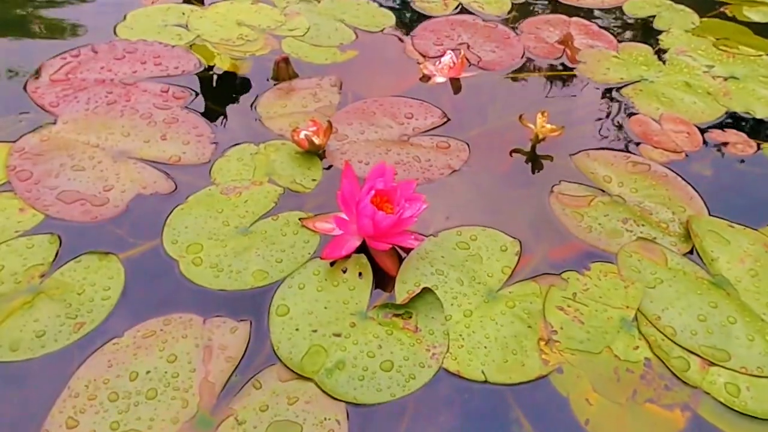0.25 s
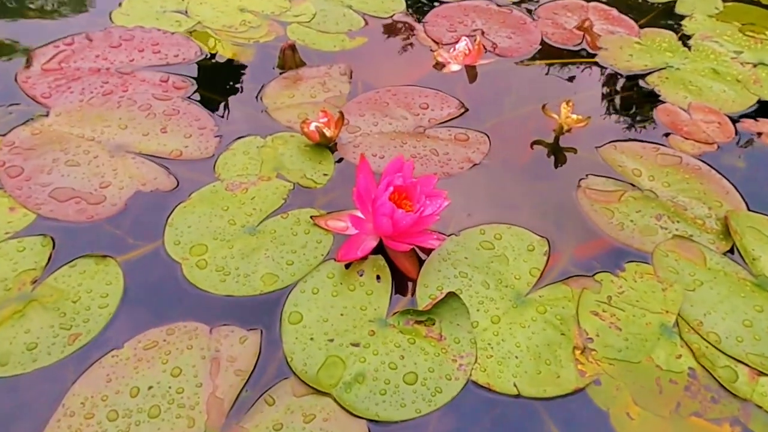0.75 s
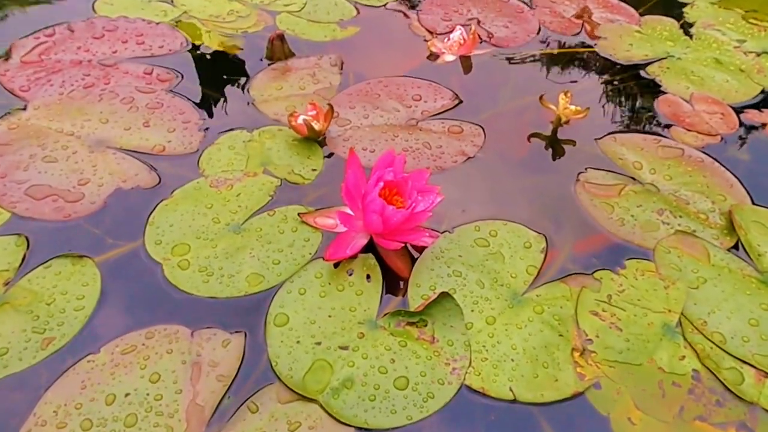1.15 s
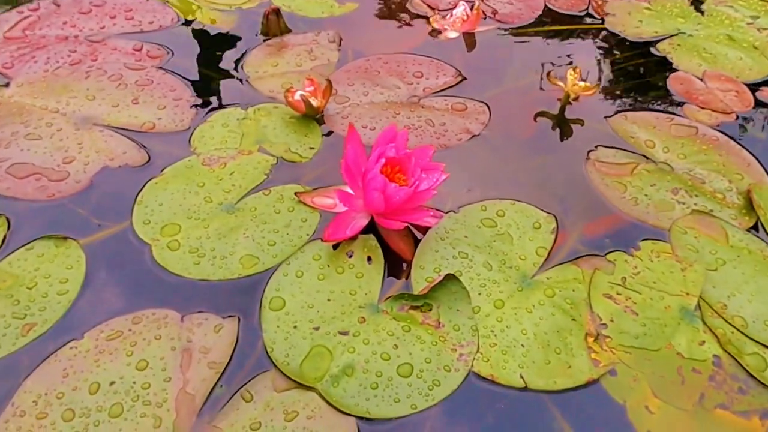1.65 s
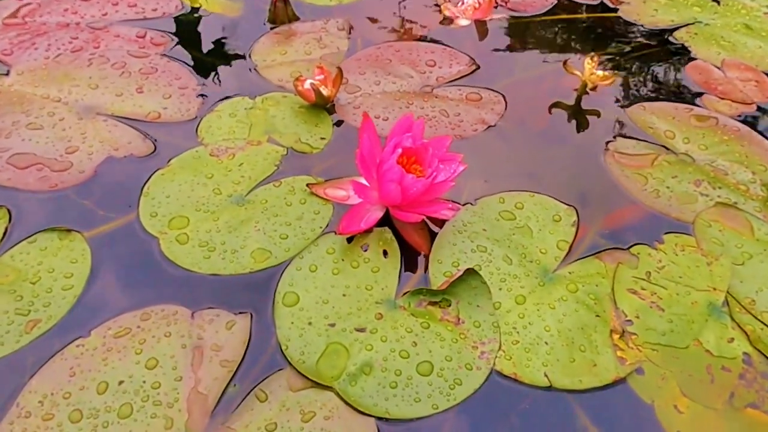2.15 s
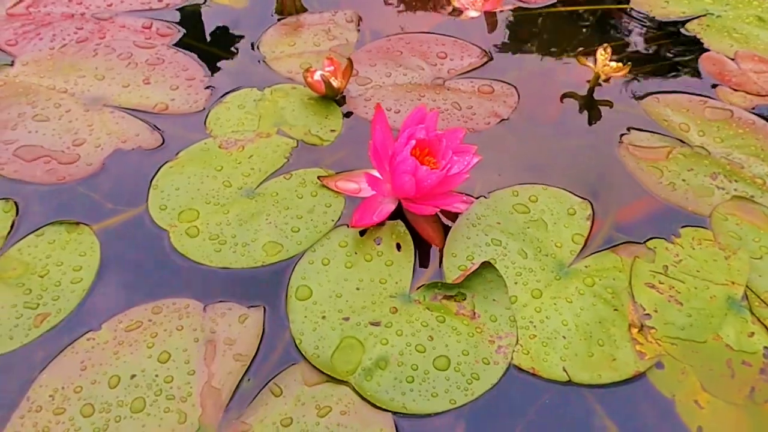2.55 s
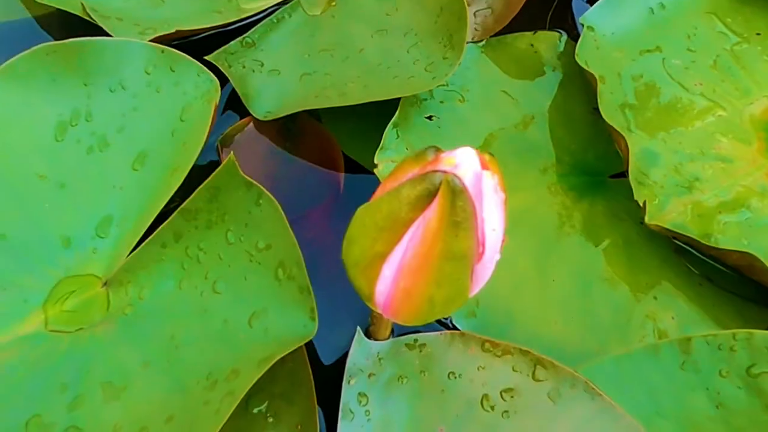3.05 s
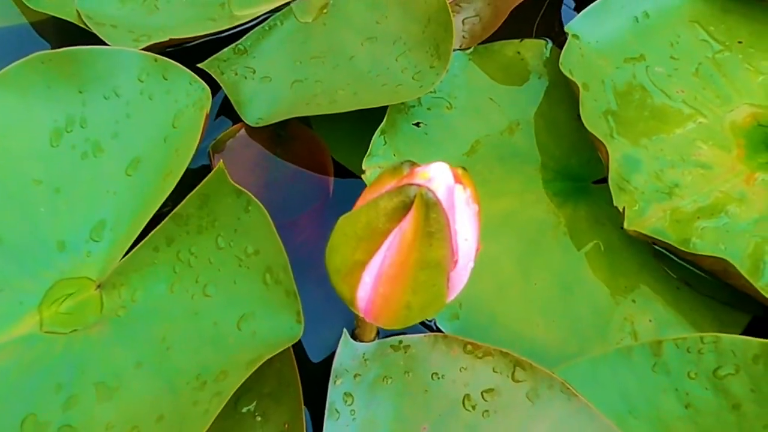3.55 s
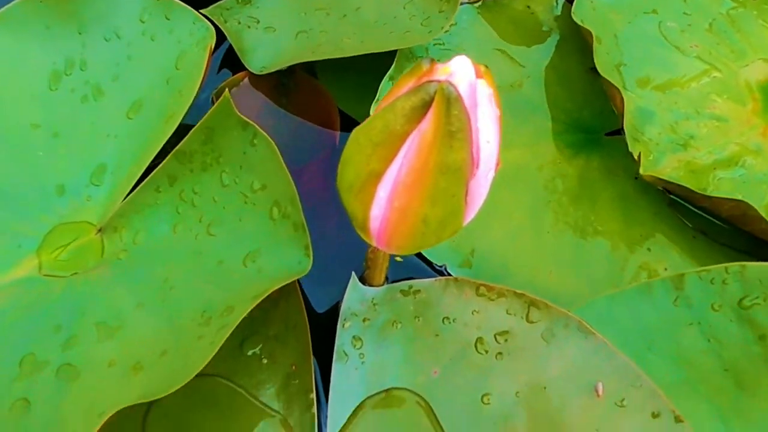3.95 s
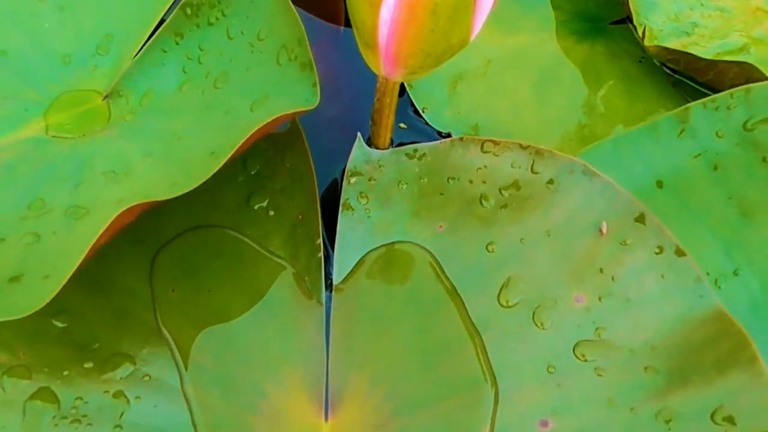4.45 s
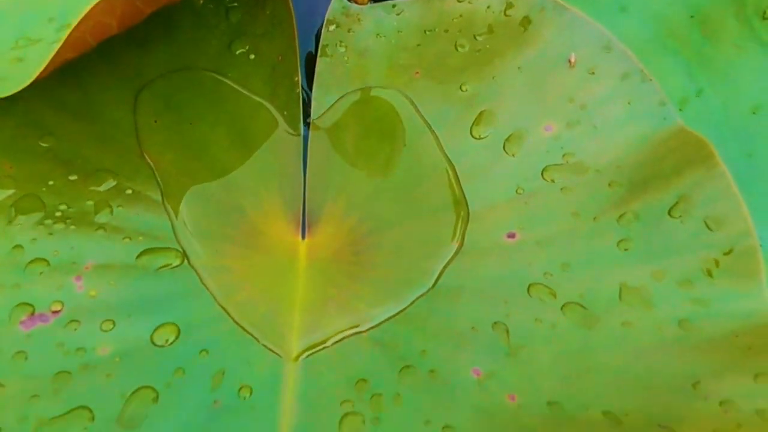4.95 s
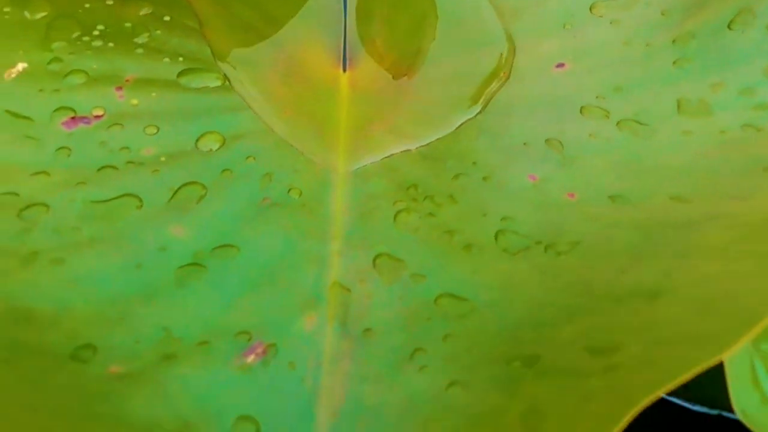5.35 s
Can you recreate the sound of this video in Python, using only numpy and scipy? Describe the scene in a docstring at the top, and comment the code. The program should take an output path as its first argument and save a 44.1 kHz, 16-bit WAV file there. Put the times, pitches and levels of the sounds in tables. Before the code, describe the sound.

Outdoors by a pond, rain falls steadily with a thick hiss of countless small drops, crisp irregular slaps on nearby leaves and little rising bubble ticks. Soft hollow watery tones slide beneath during the first part. The level stays nearly constant for three seconds, then collapses fast. The rest is almost silent: low garden murmur, faint whistly hiss and a far-off steady hum. Close, dry, narrow stereo pickup.

```python
"""A rain shower on a lily pond, full and rather dull, over a low rumble of air; a short bright patter leads in.
Near drops slap the floating leaves as brief pulses, and tiny bubbles in the water ring with rising pitch.
Crowds of small rings and shaped noise make the farther rain; soft hollow tones slide through it.
After three seconds the shower fades out quickly, leaving a faint outdoor murmur, a whistly hiss
and a far-off hum of two sines, perhaps a pump."""
import sys
import numpy as np
from scipy import signal
from scipy.fft import rfft, irfft, next_fast_len
from scipy.io import wavfile
from scipy.ndimage import uniform_filter1d, map_coordinates

SR = 44100
rng = np.random.default_rng(int(sys.argv[2]) if len(sys.argv) > 2 else 0)


def to_wav(sig):
    """Store sig (one row per channel, or 1-D mono) as 16-bit WAV at the path in sys.argv[1].

    Samples outside -1..1 are clipped; the rate is SR.
    """
    pcm = np.clip(np.atleast_2d(sig), -1, 1) * 32767
    pcm = np.round(pcm).astype(np.int16)
    wavfile.write(sys.argv[1], SR, pcm.T)  # frames by channels


N = 246959  # length [samples]

# the shower comes in, holds, then drops and low sounds fade together
SHOWER_FROM_S, SHOWER_RISE_S, SHOWER_UNTIL_S, LOW_UNTIL_S = 0.12, 0.031, 3.134, 3.135

# side level of the rain: (frequency [Hz], side minus mid [dB])
RAIN_SIDE = [(60, -27.5), (200, -30.5), (380, -25.5), (700, -24.5), (1000, -28), (1650, -14.5),
             (2400, -15.5), (5500, -16), (9000, -12), (15000, -12)]


def shower():
    """Drops on leaves and small bubbles in the pond over the hiss of far rain, a dull wash and rumbling air."""
    # spectra of drops, wash and rumbling air: (frequency [Hz], relative level [dB])
    rain_spectrum = [(500, -31.5), (850, -3), (950, 1.5), (1300, 1), (1820, -2.5), (3300, -3.5), (4300, -8),
                     (6200, -11.5), (7600, -11), (8200, -16.5), (11000, -17.5), (13200, -28), (14700, -41),
                     (15400, -59.5)]
    wash_spectrum = [(56, -25.5), (95, -0.5), (125, 0.5), (165, -3), (195, -2.5), (220, -.5), (275, -7),
                     (330, -7), (420, -9), (628, -10), (754, -14), (850, -19), (1100, -40), (1870, -120)]
    rumble_spectrum = [(8, -23), (15, -4.5), (32, 2), (43, 1), (56, -0.5), (75, -8), (95, -13), (140, -38),
                       (240, -120)]
    # how hard the shower falls: (time [s], level over its steady level [dB])
    strength = [(.2, 0), (.4, 0.3), (.55, 0), (.8, 0.3), (1.1, -0.5), (1.35, 0), (1.85, -0.5), (2.15, 0),
                (2.3, 0.2), (2.7, 0.5), (3.1, 0.1)]

    ticks = drops(rate=4500, spread_db=2.3, cycles=0.74)
    # bubbles ring far longer than impacts
    plinks = drops(rate=700, spread_db=3.1, cycles=7.92, size=800)
    far_hiss = noise(patchy_db=1.5)
    grains = ticks + amp(-7.0) * plinks + far_hiss

    s, strength_db = np.transpose(strength)
    flurry_db = 0.4 * wobble(22)  # small flurries in a very even fall
    fall_db = np.interp(np.arange(N) / SR, s, strength_db) + flurry_db
    rain = amp(fall_db) * (amp(-37) * coloured(grains, rain_spectrum, RAIN_SIDE) + far_taps())

    wash = amp(-36.0) * coloured(noise(patchy_db=1.5), wash_spectrum, RAIN_SIDE)
    rumble_level = amp(-29.0 + 0.33 * wobble(28))
    rumble = rumble_level * coloured(noise(patchy_db=0.5), rumble_spectrum, RAIN_SIDE)
    return shower_gain(SHOWER_UNTIL_S) * rain + shower_gain(LOW_UNTIL_S) * (wash + rumble)


def far_taps(rate=520, db=-36.5, spread_db=2.5, hz=3000, pitch_spread=0.88, cycles=0.93):
    """Slaps on the leaves all around, hundreds a second, each at its own distance and pitch."""
    out = np.zeros((2, N))
    t = np.arange(-SR // 500, SR // 500) / SR
    for when, near, pitch, side in rng.random((int(rate * N / SR), 4)):
        closeness = min(-np.log(1 - near), 3.5)  # few drops land close by
        tone_hz = hz * np.exp(pitch_spread * (2 * pitch - 1))
        tap = amp(db + spread_db * closeness) * slap(t, tone_hz, cycles)
        add(out, when * (N - 1) / SR, tap, pan=0.11 * (2 * side - 1))
    return out


def leaf_taps(spray_t60=0.047):
    """A drop slaps a leaf, part of it lands again a moment later, and a spray of droplets follows."""
    # the closest drops on leaves: (time [s], slap level [dB], pitch [Hz],
    # half length of the slap [cycles], rebound level [dB], spray level before its decay [dB])
    taps = [(0.0232, -19.5, 2600, 0.96, -33.5, -35.5), (0.0307, -18, 3730, .8, -33, -43),
            (0.1908, -17.5, 2280, 0.79, -40, -35), (.2203, -26, 2600, 0.99, -40, -50),
            (.3952, -25, 2200, .4, -40, -46), (0.4043, -19, 1670, 0.57, -40.5, -42),
            (0.4219, -14, 2900, 0.75, -28.5, -35), (0.4332, -21, 3400, 0.75, -41.5, -38),
            (0.437, -15, 4000, 0.35, -26.5, -39), (0.4492, -19, 2800, .9, -34, -34),
            (0.4562, -24, 3720, 0.81, -31.5, -39), (0.674, -17.5, 2660, 1.4, -30.5, -39),
            (0.7363, -28, 2400, 0.39, -40, -48), (0.7731, -23, 2400, .8, -36, -50),
            (0.8015, -24, 2700, 0.59, -32, -38), (0.8455, -25, 3000, 0.55, -40, -43),
            (0.925, -21, 2400, .6, -40, -46), (0.943, -22, 3500, 0.91, -42, -46),
            (1.0108, -18, 4000, .4, -40, -46), (1.1865, -21, 2560, 0.84, -44, -42),
            (1.251, -24, 4500, 0.46, -36, -46), (1.323, -23, 2930, .8, -38, -50),
            (1.3593, -24, 2300, .8, -41, -41), (1.3684, -20, 3300, 0.47, -36, -39),
            (1.4616, -19, 3000, 0.56, -40, -46), (1.493, -22, 3170, 1.1, -35, -45),
            (1.5819, -15, 3000, 0.48, -44, -35), (1.5883, -20, 3300, 0.7, -38, -48),
            (1.7614, -22, 2100, 0.51, -37, -39), (1.9998, -30, 2800, 0.51, -44, -48),
            (2.1688, -25, 3500, .7, -40, -47), (2.2037, -28, 3000, .6, -38, -36),
            (2.21, -23.5, 2300, 0.56, -33, -36), (2.4713, -22, 5800, 0.98, -35, -45),
            (2.5673, -20.5, 5860, 1.1, -32, -42), (2.5872, -20.5, 3800, 0.51, -27, -35),
            (2.6303, -16.5, 3300, 0.45, -22, -34), (2.7505, -22.5, 3650, 1, -38, -44),
            (2.7843, -29, 6500, 1.2, -38, -49), (2.7918, -16, 1680, 0.62, -16, -36),
            (2.803, -29, 4500, 0.56, -30, -41), (2.8794, -24, 2430, 0.87, -34, -36),
            (3.0016, -18.5, 3000, 0.51, -35, -39), (3.0737, -17.5, 3200, 0.54, -38, -41),
            (3.1111, -28, 3070, 1, -27, -49.5)]
    spray_per_s, rebound_s = 4000, 0.0009  # droplets a second; delay from slap to rebound

    out = np.zeros((2, N))
    t = np.arange(-SR // 500, SR // 20) / SR
    band = signal.butter(2, [1400, 5500], "band", fs=SR, output="sos")
    for s, db, hz, cycles, rebound_db, spray_db in taps:
        droplets = rng.standard_normal(len(t)) * (rng.random(len(t)) < spray_per_s / SR)
        spray_level = amp(spray_db - 60 * abs(t) / spray_t60) * (t > 0)
        spray = unit(signal.sosfilt(band, droplets)) * spray_level
        rebound = amp(rebound_db) * slap(t - rebound_s, hz, cycles)
        tap = amp(db) * slap(t, hz, cycles) + rebound + spray
        add(out, s + t[0], tap, pan=rng.normal(0.031, 0.05))
    return out


def slap(t, hz, cycles):
    """A drop's pressure pulse around t = 0: a sine under a bell curve, over within a few cycles."""
    return np.sin(2 * np.pi * hz * t) * np.exp(-(hz * t / cycles) ** 2)


def bubble_ticks(t60=0.0052, rise=0.214, attack=0.00015, fizz_db=-13, fizz_t60=0.012):
    """A tiny bubble rings for a moment in a bright fizz, its pitch rising as it nears the surface."""
    # the clearest bubbles trapped by near drops: (time [s], peak level of the ring [dB], middle pitch [Hz])
    bubbles = [(.437, -32, 10400), (.829, -33, 7600), (.903, -31, 6500), (1.054, -32, 9200),
               (1.251, -36, 9300), (1.545, -29, 10600), (2.105, -31, 7300), (2.216, -26, 6370),
               (2.3995, -37, 11100), (2.631, -33.5, 9400), (2.689, -32.5, 11000), (2.803, -33, 5700)]

    out = np.zeros((2, N))
    t = np.arange(SR // 50) / SR
    band = signal.butter(2, [4500, 13000], "band", fs=SR, output="sos")
    for s, db, hz in bubbles:
        glide = hz * (1 + rise * (1 - 2 * np.exp(-t / 0.001)))
        envelope = amp(-60 * t / t60) * (1 - np.exp(-t / attack))
        ring = np.sin(2 * np.pi * np.cumsum(glide) / SR) * envelope
        fizz_noise = unit(signal.sosfilt(band, rng.standard_normal(len(t))))
        fizz = fizz_noise * amp(fizz_db - 60 * t / fizz_t60)
        add(out, s, amp(db) * (ring / np.abs(ring).max() + fizz), pan=rng.normal(0, 0.304))
    return out


def patter():
    """Bright, close splashing of short rings and noise with a little low body, fullest right at the start."""
    # spectra of splash and body: (frequency [Hz], relative level [dB])
    splash_spectrum = [(150, -23), (250, 2), (318, -12.5), (347, -9), (507, -12), (821, -8.5), (2390, -8.5),
                       (3620, -7), (9180, -9.5), (15400, -13.5)]
    body_spectrum = [(15, -16.0), (60, 2.5), (110, -2.0), (250, -7.0), (330, -18.5), (900, -120)]
    # side level of the splash: (frequency [Hz], side minus mid [dB])
    splash_side = [(60, -21), (110, -21), (200, -26), (380, -20), (700, -24.5), (1290, -35), (2380, -28),
                   (4400, -30.5), (8120, -27.5), (15000, -7.5)]
    # it eases from the start; from until_s on, the faster fade comes on top
    sag_db_per_s, fade_db_per_s, until_s = 35, 135, 0.083

    splash = drops(rate=4500, spread_db=2.05, cycles=0.57) + amp(-2) * noise(patchy_db=1.8)
    splash = coloured(splash, splash_spectrum, splash_side)
    body = coloured(noise(patchy_db=2.0), body_spectrum, RAIN_SIDE)
    t = np.arange(N) / SR
    level = amp(-sag_db_per_s * t - fade_db_per_s * np.maximum(t - until_s, 0))
    return level * (amp(-30.0) * splash + amp(-39.5) * body)


def swash(crest_s=0.8, half_s=0.8, db=-49):
    """A hollow, watery rush of band-shaped noise that is strongest early in the shower."""
    # spectrum of the rush: (frequency [Hz], relative level [dB])
    rush_spectrum = [(220, -42), (330, -3.5), (420, 0), (540, -3), (650, -0.5), (800, -11), (1000, -29.5),
                     (1500, -120)]
    swell = np.exp(-((np.arange(N) / SR - crest_s) / half_s) ** 2)
    rush = coloured(noise(patchy_db=2.0), rush_spectrum, RAIN_SIDE)
    return amp(db) * swell * shower_gain(LOW_UNTIL_S) * rush


def hollow_tones(waver_db=1.5, drift_hz=5):
    """Soft, slightly unsteady single tones that swell, slide and sink back into the rain."""
    # (time of the crest [s], half length [s], pitch at the crest [Hz], glide [Hz/s], level at the crest [dB])
    tones = [(.31, 0.12, 490, -560, -50), (0.461, 0.13, 655, 130, -47), (0.629, .09, 435, -200, -49),
             (.81, 0.052, 491, -50, -45.5), (0.912, .07, 400, 0.5, -44.5), (0.961, 0.066, 615, 300, -51),
             (1.27, 0.1, 462, -250, -49.5)]
    t = np.arange(N) / SR
    out = np.zeros(N)
    waver = amp(waver_db * wobble(40))
    drift = drift_hz * wobble(40)
    for s, half_s, hz, glide, db in tones:
        phase = 2 * np.pi * np.cumsum(hz + glide * (t - s) + drift) / SR
        out += amp(db) * np.exp(-((t - s) / half_s) ** 2) * unit(np.sin(phase))
    return waver * out


def hum(hz=176.3, drift_hz=0.66, waver_db=1.3, waver_rate=3):
    """One distant tone and its octave, which swells now and then and sinks as the shower fades."""
    # slow swells: (time of the crest [s], half width [s], lift [dB])
    swells = [(.05, 0.2, 3), (1.42, 0.14, 8), (2.65, 0.3, 2.5), (3.6, .25, 4.5), (4.85, 0.41, 5)]
    t = np.arange(N) / SR
    phase = 2 * np.pi * np.cumsum(hz + drift_hz * wobble(9.2)) / SR
    tone = unit(np.sin(phase) + amp(-19.5) * np.sin(2 * phase))
    swell_db = sum(db * np.exp(-((t - s) / width) ** 2) for s, width, db in swells)
    level = amp(-47) * fade(SHOWER_UNTIL_S) + amp(-70)  # the second part stays on in the calm
    return level * amp(swell_db + waver_db * wobble(waver_rate)) * tone


def calm():
    """The faint low murmur and thin, whistly hiss of the garden, heard as the shower fades."""
    # spectra of murmur and hiss: (frequency [Hz], relative level [dB])
    murmur_spectrum = [(20, 8.5), (32, 18.5), (60, 10.5), (95, 2.5), (135, -0.8), (220, -3.5), (310, -7.5),
                       (450, -11), (700, -14.5), (1050, -15.5), (1250, -18), (1450, -23.5), (1850, -26),
                       (2150, -33), (3500, -80.5)]
    hiss_spectrum = [(1200, -24.5), (2200, -1), (3000, 1), (3550, -.5), (4000, -2.5), (5300, -3),
                     (5900, -7), (7700, -6.5), (8500, -14), (11000, -17), (14000, -26)]
    # side level of the calm: (frequency [Hz], side minus mid [dB])
    calm_side = [(60, -24), (110, -27), (200, -35), (380, -28.5), (700, -33), (1290, -15.5), (2380, -7),
                 (4400, -9), (8120, -9.5), (15000, 0.5)]
    murmur = amp(-52) * coloured(noise(patchy_db=0.5), murmur_spectrum, calm_side)
    hiss = amp(-80.5) * coloured(noise(patchy_db=1.6), hiss_spectrum, calm_side)
    return (1 - shower_gain(SHOWER_UNTIL_S)) * (murmur + hiss + whistles())


def whistles():
    """Narrow bands of hiss that swell, drift in pitch and sink again."""
    # (time of the crest [s], half length [s], pitch at the crest [Hz], glide [Hz/s],
    # bandwidth [Hz], level at the crest [dB])
    whistle_bands = [(3.351, 0.69, 1326, -90.5, 200, -81.5), (3.696, .55, 3400, -1, 482, -86),
                     (4.197, .3, 3580, 82.5, 240, -90), (4.6, 1.3, 1746, -110, 302, -85.5),
                     (4.852, 0.54, 2785, -350, 420, -88.5), (5.449, .35, 2418, -200, 320, -88.5),
                     (5.55, 0.303, 3480, 0, 278, -91)]
    t = np.arange(N) / SR
    out = np.zeros((2, N))
    for s, half_s, hz, glide, width_hz, db in whistle_bands:
        band = unit(filtered(rng.standard_normal((2, N)), lambda f: np.exp(-(2 * f / width_hz) ** 2)))
        # the two slow noises ride on a cosine and a sine, which lifts the band to its pitch
        phase = 2 * np.pi * np.cumsum(hz + glide * (t - s)) / SR
        whistle = band[0] * np.cos(phase) + band[1] * np.sin(phase)
        out += amp(db) * np.exp(-((t - s) / half_s) ** 2) * whistle
    return out


def fade(until_s):
    """Gain that holds at 1, then falls at a steady rate in dB and closes."""
    fade_db_per_s, fade_s = 204, 0.11
    late = np.maximum(np.arange(N) / SR - until_s, 0)
    closing = np.clip(10 * (1 - late / fade_s), 0, 1)  # shuts over the last tenth of the fade
    return amp(-fade_db_per_s * late) * closing


def shower_gain(until_s):
    """How much of the shower is heard: quick rise, long hold, fade."""
    rise = np.clip((np.arange(N) / SR - SHOWER_FROM_S) / SHOWER_RISE_S, 0, 1)
    return rise * fade(until_s)


def drops(rate, spread_db, cycles, size=192):
    """Countless small impacts, each a damped ring of its own pitch, size and side: a near-white mid and side pair."""
    when, pitch, near, life, side = rng.random((int(rate * N / SR), 5)).T
    low_hz, high_hz = 600, 15000
    hz = (low_hz * (high_hz / low_hz) ** pitch)[:, None]
    turns = hz * np.arange(size) / SR
    closeness = np.minimum(-np.log(1 - near), 5)  # few drops land close by
    ring = np.sin(2 * np.pi * turns) * np.exp(-turns / (cycles * (0.5 + life[:, None])))
    ring = ring * hz * amp(spread_db * closeness)[:, None]  # higher rings are shorter and start louder
    at = ((when * N).astype(int)[:, None] + np.arange(size)).ravel()

    def mix(rings):
        """Sum all rings at their times."""
        return unit(np.bincount(at, rings.ravel(), N + size)[:N])

    return np.array([mix(ring), mix(ring * (2 * side[:, None] - 1))])


def noise(patchy_db):
    """Two white noises with patches of random gain in time and frequency."""
    z = signal.stft(rng.standard_normal((2, N)), nperseg=512)[2]
    field = uniform_filter1d(rng.standard_normal(z.shape[1:]), size=7, axis=0)
    field = uniform_filter1d(field, size=8, axis=1)
    return unit(signal.istft(z * amp(patchy_db * unit(field)), nperseg=512)[1][:, :N])


def coloured(pair, spectrum, side_level):
    """A white mid and side pair becomes left and right of rms 1 with this spectrum and side level."""
    def gain(hz):
        """Spectrum for both, side level for the side alone."""
        return amp(along(spectrum, hz)) * np.array([np.ones_like(hz), amp(along(side_level, hz))])

    mid, side = filtered(pair, gain)
    return unit(np.array([mid + side, mid - side]))


def filtered(x, gain):
    """x times a gain that depends on frequency."""
    m = next_fast_len(N + SR // 2)
    return irfft(rfft(x, m) * gain(np.fft.rfftfreq(m, 1 / SR)), m)[..., :N]


def along(points, hz):
    """(Hz, value) points read on a log axis."""
    f, v = np.transpose(points)
    return np.interp(np.log(hz + 1), np.log(f + 1), v)


def wobble(rate):
    """A smooth random curve, rate knots a second."""
    knots = rng.standard_normal(int(N * rate / SR) + 4)
    return map_coordinates(knots, [np.arange(N) * rate / SR])


def add(out, s, sound, pan):
    """Mix a short sound into the stereo track at time s; a positive pan leans left."""
    i = max(round(s * SR), 0)
    out[:, i:i + len(sound)] += np.outer([1 + pan, 1 - pan], sound)[:, :N - i]


def amp(db):
    """Decibels to gain."""
    return 10 ** (np.asarray(db) / 20)


def unit(x):
    """Scale to rms 1."""
    return x / np.sqrt(np.mean(x ** 2) + 1e-20)


def scene():
    """Everything in the open air, without echo."""
    rain = shower() + leaf_taps() + bubble_ticks() + patter()
    return rain + swash() + hollow_tones() + hum() + calm()


def record(dry):
    """The recorder keeps nothing above its band limit."""
    top_hz = 15700
    return filtered(dry, lambda hz: np.clip((top_hz - hz) / 400, 0, 1))


dry = scene()
out = record(dry)
to_wav(out)
```